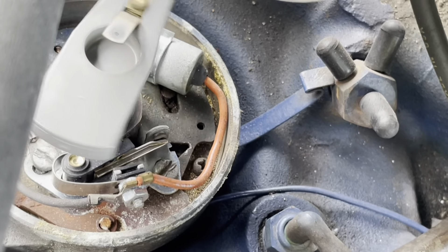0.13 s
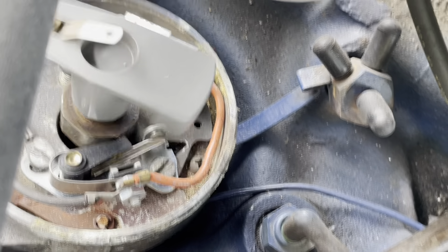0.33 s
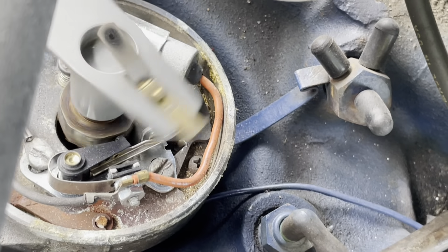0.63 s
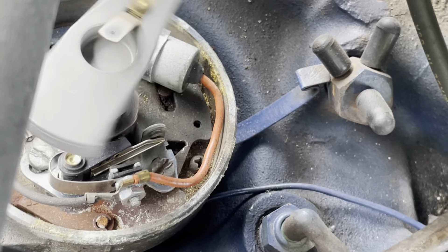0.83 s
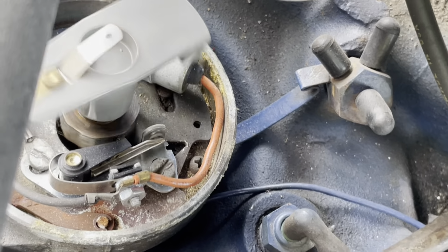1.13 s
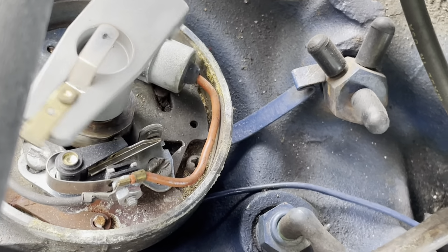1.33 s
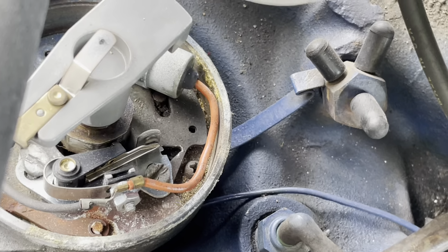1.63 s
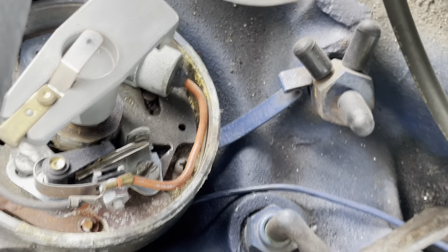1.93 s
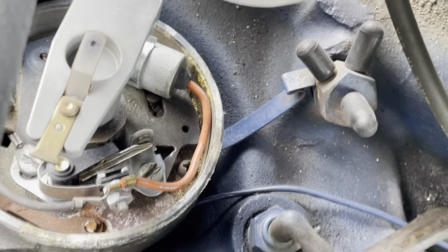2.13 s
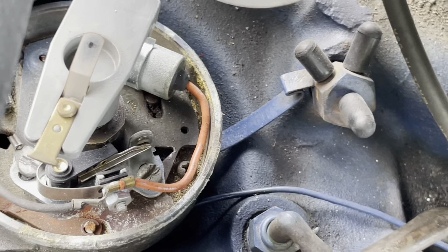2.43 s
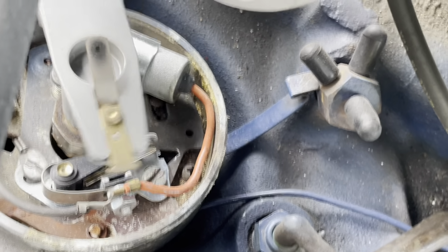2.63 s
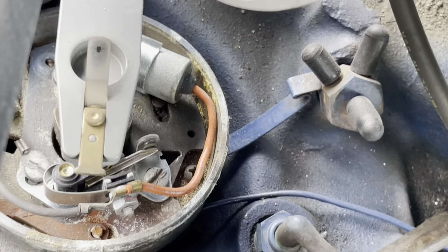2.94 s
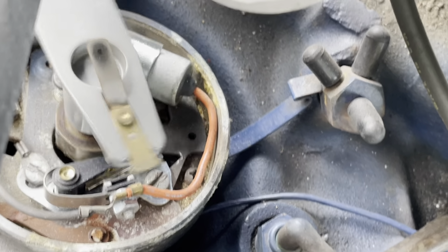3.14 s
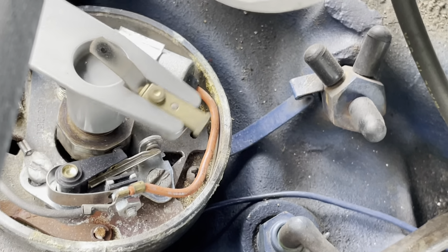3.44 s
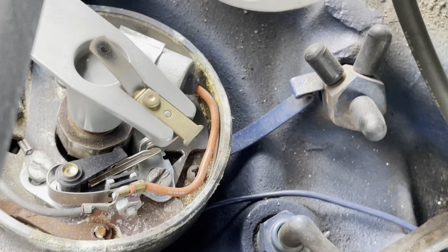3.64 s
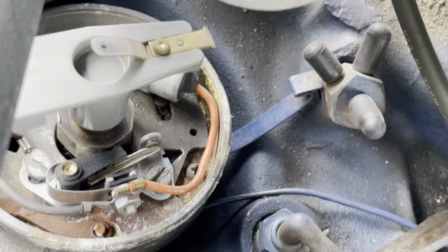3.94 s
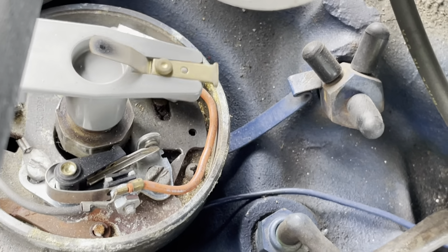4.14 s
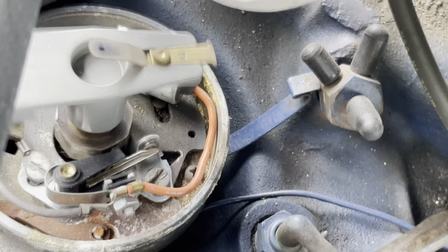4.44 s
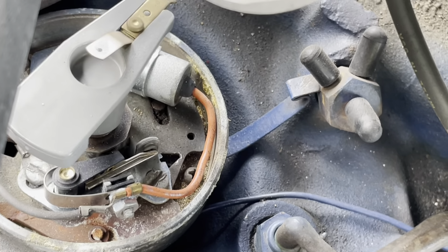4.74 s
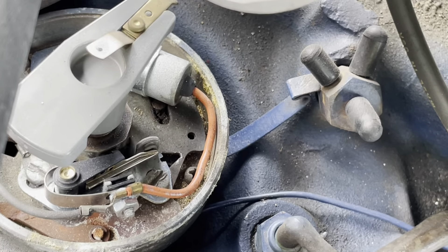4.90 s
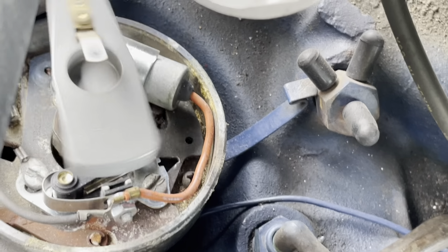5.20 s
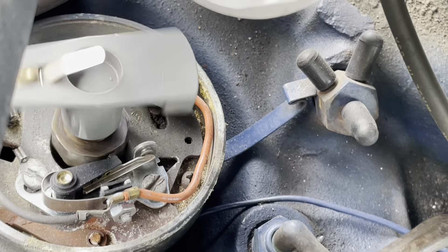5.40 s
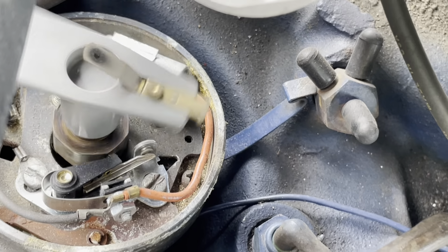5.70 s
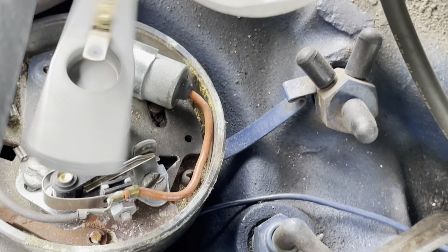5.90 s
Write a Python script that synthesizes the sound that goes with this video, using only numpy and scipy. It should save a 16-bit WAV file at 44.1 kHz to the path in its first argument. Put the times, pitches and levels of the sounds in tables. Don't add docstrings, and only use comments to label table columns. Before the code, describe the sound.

Heard very close in a garage with short hard echoes and almost no background noise. From 0 to 1.1 seconds a starter cranks a cold engine: gritty metallic grinding and a rough gear whine surge about ten or eleven times a second, sagging in pitch on each compression. At 1.15 it releases with clacks, and a thin airy whirr fades while low rumble dies. At 1.9 a loud clank and grating clash land, with a brief hum sliding down until about 2.4. Hard bumps slam at 2.5, 3.03, 3.73 and 4.37, each followed by a duller rebound, rocking rumble and lighter release knocks; a metal cover rings at mid pitch, and thin high squeaks appear near 2.85, 3.4 and 4.1. Between them it nearly falls silent. A fifth slam at 5.03 turns into renewed pulsing cranking from 5.2, gathering speed, continuing past 6 seconds without firing.

```python
import sys
import numpy as np
from scipy import signal
from scipy.fft import rfft, irfft, next_fast_len
from scipy.io import wavfile

SR = 44100
rng = np.random.default_rng(int(sys.argv[2]) if len(sys.argv) > 2 else 0)


def unload_wav(signal):
    wavfile.write(
        sys.argv[1],
        SR,
        np.round(np.clip(np.atleast_2d(signal).T, -1, 1) * 32767).astype(np.int16),
    )


def undo_db(level):
    steps = np.asarray(level, float) / 20
    return 10 ** steps


N = 267378
SIZE = next_fast_len(N + SR)
HZ = np.maximum(np.arange(SIZE // 2 + 1) * SR / SIZE, 1.0)
TIME = np.arange(N) / SR
DELAY = np.exp(-2j * np.pi * HZ / SR)


def rms_one(x):
    return x / np.sqrt(np.mean(x ** 2) + 1e-20)


def at_hz(points, hz):
    points = np.array(points, float)
    log_hz = np.log(np.maximum(points[:, 0], 1.0))
    return np.interp(np.log(hz), log_hz, points[:, 1])


def shaped(x, response):
    return irfft(rfft(x, SIZE) * response, SIZE)[..., :N]


def drift(rate_hz):
    r = np.exp(-2 * np.pi * rate_hz * 8 / SR)
    settle = 4000
    noise = rng.standard_normal(N // 8 + 2 + settle)
    slow = signal.lfilter([1], [1, -2 * r, r * r], noise)[settle:]
    return np.interp(np.arange(N) / 8, np.arange(len(slow)), rms_one(slow))


def resonance(hz, t60):
    r = undo_db(-60 / (t60 * SR))
    w = 2 * np.pi * hz / SR
    poles = 1 - DELAY * (2 * r * np.cos(w) - r * r * DELAY)
    return (1 - r * r) / 2 * (1 - DELAY * DELAY) / poles


def struck(s, rise, t60):
    i = max(round(s * SR), 0)
    t = TIME[:min(N - i, SR)]
    swell = np.clip(t / max(rise, 2e-4), 0, 1)
    return i, t, swell * undo_db(-60 * np.maximum(t - rise, 0) / max(t60, .01))


def tone(spans, wobble):
    out = np.zeros(N)
    for rows in spans:
        s, hz, level_db = np.transpose(rows)
        fade = np.clip(np.minimum(TIME - s[0], s[-1] - TIME) / 0.0027, 0, 1)
        pitch = np.interp(TIME, s, hz) * (1 + wobble * drift(40.0))
        phase = 2 * np.pi * np.cumsum(pitch) / SR
        out += np.sqrt(2) * fade * undo_db(np.interp(TIME, s, level_db)) * np.sin(phase)
    return out


# (frequency [Hz], level [dB])
IRON_COLOUR = [(25, -21), (50, -11.5), (80, -1.5), (135, -4.5), (200, -2.5), (265, -10.5), (400, -4.5),
               (650, -7.5), (1000, -9), (1450, -7.5), (2500, -11), (4200, -8.5), (6000, -11.5),
               (7300, -15.5)]
HUSH_DB = -68


def room_hush():
    noise = rng.standard_normal((2, N))
    return undo_db(HUSH_DB) * rms_one(shaped(noise, undo_db(at_hz(IRON_COLOUR, HZ))))


# (frequency [Hz], level against the direct sound [dB])
ECHO_WIDTH = [(60, -21), (160, -11.5), (300, -9), (500, -8.5), (900, -5), (1800, -4.5), (2300, -15),
              (3300, -22.5), (5500, -35), (7000, -4), (8200, -24), (9800, -1), (11500, -17), (13200, 0),
              (15000, -14)]
ECHO_T60_S = .1


def garage(x):
    t = TIME[:SR // 4]
    sprays = rng.standard_normal((2, len(t))) * undo_db(-60 * t / ECHO_T60_S)
    sprays = sprays / np.sqrt(np.sum(sprays ** 2, axis=1, keepdims=True))
    path = 2.5 * drift(4)
    walls = rfft(sprays, SIZE) * undo_db(at_hz(ECHO_WIDTH, HZ))
    echoes = shaped(x * [np.cos(path), np.sin(path)], walls)
    return echoes.sum(axis=0) * [[1], [-1]]


# (time [s], level [dB])
FREEWHEEL_LEVEL = [
    (1.17, -65),
    (1.22, -37.5),
    (1.5, -42),
    (1.89, -49.5),
    (1.9, -95),
]
# (frequency [Hz], decay T60 [s], level [dB])
FREEWHEEL_MODES = [(5200, 0.013, -11), (5630, 0.016, -4), (5890, .012, -4), (7030, 0.01, -9)]


def freewheel():
    response = sum(undo_db(level_db) * resonance(hz, t60) for hz, t60, level_db in FREEWHEEL_MODES)
    whirr = rms_one(shaped(rng.standard_normal(N), response))
    level_db = np.interp(TIME, *np.transpose(FREEWHEEL_LEVEL), left=-120)
    return whirr * undo_db(level_db + 1.5 * drift(14.0))


# (time [s], frequency [Hz], level [dB])
HUM_GLIDE = [
    [(1.98, 197.6, -15), (2.014, 175.5, -29), (2.054, 180.3, -27), (2.178, 162.5, -40), (2.314, 165.5, -38),
     (2.334, 164, -57), (2.41, 168, -42), (2.46, 182, -60)],
]


def motor_hum():
    return tone(HUM_GLIDE, wobble=0.033)


# (time [s], frequency [Hz], level [dB])
COVER_RINGING = [
    [(0.0, 539.2, -24.5), (0.024, 549, -27), (0.068, 543, -29), (0.1, 546, -27)],
    [(2.875, 545.5, -16), (2.881, 550, -22), (2.889, 550, -51), (2.903, 548, -31), (3.0, 530, -46.5)],
    [(3.492, 542, -15), (3.498, 545.4, -17), (3.512, 554, -53), (3.52, 539, -26.5), (3.66, 530, -50)],
    [(3.76, 547.8, -38), (3.78, 552, -35), (3.794, 538, -38), (3.812, 565, -25), (3.87, 590, -51)],
    [(4.125, 565.3, -17), (4.143, 550, -46), (4.151, 544.1, -37), (4.241, 524, -47), (4.25, 537.9, -38)],
    [(4.43, 553, -29), (4.46, 555, -24), (4.478, 563.6, -49), (4.516, 540.6, -19.5), (4.678, 539, -48),
     (4.72, 550, -62)],
]


def cover():
    return tone(COVER_RINGING, wobble=0.0043)


# (time [s], frequency [Hz], level [dB])
BEARING_SQUEAL = [
    [(2.78, 5678, -64), (2.794, 5658, -45), (2.814, 5641, -49), (2.856, 5715, -35), (2.908, 5700, -33.5),
     (2.93, 5631, -68)],
    [(3.4, 5647, -64.5), (3.41, 5682, -44), (3.422, 5720, -40), (3.435, 5649, -50)],
    [(4.04, 5550, -56), (4.048, 5800, -49), (4.126, 5720, -36), (4.156, 5707, -35), (4.165, 5700, -51)],
]


def bearing_squeal():
    return tone(BEARING_SQUEAL, wobble=0.00228)


# (time [s], frequency [Hz], level [dB], swell [s], decay T60 [s])
PART_RINGS = [(0, 220, -28, 0.012, 0.33), (.21, 2650, -20.5, 0.014, 0.19), (1.29, 1115, -26, 0.0033, 0.092),
              (1.31, 152, -27, .02, 0.17), (1.33, 56.7, -26, 0.022, 0.92), (1.72, 413, -35.5, 0.0071, 0.1),
              (1.915, 356, -14.5, 0.0065, 0.19), (1.95, 333, -14.5, 0.017, 0.18),
              (2.22, 716, -43, 0.012, 0.96), (2.33, 1635, -61, 0.057, 1.4), (2.52, 82, -42, .04, 0.66),
              (2.874, 433, -26.5, 0.0034, 0.21), (3.05, 81, -28, 0.034, 0.37),
              (3.1, 2450, -45, 0.026, 0.71), (3.495, 5680, -36, .008, .12), (3.73, 330, -16, .01, 0.15),
              (3.75, 80, -33.5, 0.028, .6), (3.77, 803, -29, .02, 0.19), (4.39, 80.4, -36, 0.022, 0.38),
              (4.45, 813, -28, 0.038, 0.24), (5.06, 81, -32.5, 0.047, 0.38), (5.4, 907, -27, 0.038, .8),
              (5.71, 906, -28.5, 0.016, .5), (5.941, 2980, -31, 0.016, .25), (5.97, 73, -25, 0.015, 0.23),
              (6.02, 84.5, -25, .02, 0.37)]


def rings():
    out = np.zeros(N)
    unsteady = undo_db(2.0 * drift(54.0))
    for s, hz, level_db, swell, t60 in PART_RINGS:
        i, t, shape = struck(s, swell, t60)
        out[i:i + len(t)] += np.sqrt(2) * undo_db(level_db) * shape * np.sin(2 * np.pi * hz * t)
    return out * unsteady


# (time [s], load [dB], tooth rate [Hz], loaded time [s], tooth tone level [dB])
COMPRESSIONS = [(-.01, -12, 339.2, 0.0701, -7.5), (.095, -3.5, 380.4, .07, 0.5),
                (.212, -3, 425.4, 0.074, 4.5), (0.319, 5, 485, 0.0639, -2),
                (0.404, -1.5, 498.5, 0.054, 1.5), (0.497, -13, 495.1, 0.079, -0.5),
                (0.584, -9, 497.7, 0.064, -7), (0.668, -2.5, 502.6, 0.0457, -1),
                (0.748, -14, 497.3, 0.08, -4), (0.827, -2, 500.8, 0.0678, 1.5),
                (0.923, -5, 495.6, 0.04, -8.5), (1.01, -8, 491.6, 0.0623, 1), (1.089, -1.5, 500, .05, -3),
                (5.185, -11, 385, .08, -2), (5.305, -1.5, 430.4, 0.0803, 1.5),
                (5.408, -2, 467, 0.0705, -0.5), (5.509, -0.5, 492, 0.063, 0),
                (5.603, -9, 455, 0.0662, -0.5), (5.69, -2, 486.8, .065, -1), (5.78, -8, 491.7, 0.06, 1.5),
                (5.864, -28, 482.7, 0.0594, 0), (5.958, 0.5, 459, 0.0587, 0), (6.036, 5.5, 500, 0.04, 1.5)]
SLOWING = .11


def compression():
    load, strength, knots = np.zeros(N), np.zeros(N), []
    for s, load_db, tooth_hz, length, tone_db in COMPRESSIONS:
        part = np.clip((TIME - s) / length, 0, 1.4)
        load += np.clip(part / .1, 0, 1) * np.clip((1.3 - part) / .55, 0, 1) * undo_db(load_db)
        strength += np.clip(part / 0.2, 0, 1) * np.clip((1.15 - part) / 0.69, 0, 1) * undo_db(tone_db)
        knots += [(s, tooth_hz), (s + length, tooth_hz * (1 - SLOWING))]
    return load, strength, np.interp(TIME, *np.transpose(knots))


# (frequency [Hz], level [dB])
HOUSING_RESPONSE = [(300, -28), (450, -28.5), (800, -27), (1000, -37), (1250, -25.5), (1500, -23.5),
                    (1800, -51), (2400, -33.5), (3000, -36.5), (4500, -38)]


def teeth(strength, tooth_hz):
    phase = 2 * np.pi * np.cumsum(tooth_hz * (1 + .022 * drift(45))) / SR
    out = np.zeros(N)
    for k in range(1, 10):
        rate_hz = 18 + 5 * k
        uneven = 1 + .75 * (drift(rate_hz) + 1j * drift(rate_hz))
        out += undo_db(at_hz(HOUSING_RESPONSE, k * tooth_hz)) * np.imag(uneven * np.exp(1j * k * phase))
    return strength * out


# (time [s], peak [dB], block share [dB], hiss share [dB], decay T60 [s], rise [s])
GEAR_BLOWS = [(1.1444, -15.5, 6, -1, 0.24, 0.004), (1.1862, -20, 8.5, -5.5, 0.08, 0.0029),
              (1.293, -24.5, -1.5, -17, 0.094, 0.0041), (1.3144, -37.5, 6, 1, 0.17, 0.0058),
              (1.8972, -17, -3, 6.5, 0.32, 0.0054), (1.9144, -5, -2.5, -8, 0.12, 0.005),
              (2.5014, -13, -13, 3, 0.11, 0.012), (2.5122, -3.5, -5, -11, 0.11, 0.0033),
              (2.6243, -21, -3, -7, 0.14, 0.0036), (2.7488, -33.5, 10, -13, 0.3, 0.0061),
              (2.8737, -19, 5, -8.5, 0.11, 0.0043), (3.013, -19, 3, 2, 0.13, 0.0091),
              (3.033, -7.5, -2, -1.5, 0.11, 0.0064), (3.2291, -15, 3, -6, 0.21, 0.005),
              (3.4008, -27, 1, -16, 0.3, 0.0024), (3.4925, -21, 4.5, -3, 0.14, 0.0034),
              (3.7098, -27.5, -16, 1, 0.14, 0.0039), (3.7094, -19.5, -2, 5, 0.1, 0.0066),
              (3.7278, -7, -1.5, -3, 0.16, 0.004), (3.8928, -20.5, 6.5, 0.5, 0.088, 0.0028),
              (4.016, -37, -5, -6, 0.094, 0.005), (4.1217, -20.5, 1.5, -7, 0.13, 0.0047),
              (4.354, -15, -5, 1, 0.094, 0.0082), (4.3718, -5, -2, -6, 0.085, 0.0077),
              (4.5092, -18, 1, -9, 0.079, 0.0043), (4.664, -39, 14, -27, 0.058, 0.0035),
              (4.791, -22, 2.5, -6, 0.15, 0.0026), (5.0155, -32.5, -10.5, -2, 0.13, 0.0041),
              (5.018, -17, 0.5, 3, 0.17, 0.0067), (5.0358, -6, -2, -5, 0.091, 0.0058)]
AIR_BLOW_DB = -1.5
CRACK_DB, CRACK_RISE_S, CRACK_T60_S = 2.5, 0.00096, 0.029


def blows():
    force = np.zeros((5, N))
    for s, peak_db, block_db, hiss_db, t60, rise in GEAR_BLOWS:
        i, t, body = struck(s, rise, t60)
        span = slice(i, i + len(t))
        shares_db = np.array([block_db - 15, block_db, 0, hiss_db, hiss_db + AIR_BLOW_DB])
        force[:, span] += undo_db(peak_db - 6.0 + shares_db)[:, None] * body
        crack = struck(s, CRACK_RISE_S, CRACK_T60_S)[2]
        crack_db = peak_db + hiss_db + CRACK_DB - np.array([[7.5], [0]])
        force[3:, span] += undo_db(crack_db) * crack
    return force


# (frequency [Hz], level [dB], decay T60 [s])
IRON_MODES = [(60, -4.5, 0.51), (330, -2.5, 0.12), (439.2, -6, 0.17), (544.5, 4.5, 0.28),
              (808.4, 2.5, 0.098), (1115, -6.5, 0.098), (1360, -10, 0.14), (1495, -4.5, 0.31),
              (1620, -4, 0.27), (1922, -3.5, 0.18), (2256, -2.5, 0.055), (2438, -2, 0.046), (2980, -5, .08),
              (3130, -8.5, 0.043), (3520, -6, 0.082), (4110, -1, 0.062), (4410, -5.5, .09),
              (4824, -2, 0.042), (5190, -5, 0.035), (5620, -5.5, 0.044), (5870, -1.5, 0.073),
              (6760, -0.5, 0.17), (7090, -5.5, 0.024)]
BAND_BORDERS = (235, 950, 3250, 7600)


def iron_bands():
    response = np.ones((2, len(HZ)), complex)
    for hz, level_db, t60 in IRON_MODES:
        uneven_db = rng.choice([-1, 1]) * np.array([[5], [-5]])
        response += undo_db(level_db + 3.0 + uneven_db) * resonance(hz, t60)
    response = response * undo_db(at_hz(IRON_COLOUR, HZ))
    lows = [1 / (1 + 1.414j * HZ / edge - (HZ / edge) ** 2) ** 2 for edge in BAND_BORDERS]
    highs = [low * (HZ / edge) ** 4 for low, edge in zip(lows, BAND_BORDERS)]
    slices = [high * low * response for high, low in zip([1] + highs, lows + [1])]
    return [s / np.sqrt(np.mean(np.abs(s) ** 2, axis=1, keepdims=True)) for s in slices]


def grit(per_s, spread_db):
    contacts = rng.random(N) < per_s / SR
    sizes = undo_db(spread_db * np.minimum(rng.exponential(1, N), 2)) * contacts
    return rms_one(rng.standard_normal(N) * (1 + sizes))


# (time [s], rocking rumble [dB], block [dB], gear grind [dB], brush hiss [dB])
RUNNING_NOISE = [
    [(0.0, -45, -31, -36.5, -43), (0.146, -37.5, -32.5, -28.5, -34.5), (0.286, -39.5, -33.5, -30.5, -30),
     (0.418, -39, -36.5, -26.5, -29), (0.544, -34, -26.5, -23, -29), (0.698, -38.5, -33.5, -25.5, -23.5),
     (0.908, -39, -27.5, -25.5, -34.5), (1.038, -36.5, -35, -24.5, -22), (1.13, -40, -33, -27, -31)],
    [(1.14, -38, -27, -24.5, -37), (1.222, -36, -33, -42, -51), (1.33, -31, -37.5, -42, -40.5),
     (1.418, -37.5, -44, -45, -41.5), (1.688, -45.5, -45, -51, -45.5), (1.89, -51, -48.5, -48, -47.5)],
    [(2.11, -48, -39, -48, -57), (2.164, -43, -42, -49.5, -60), (2.256, -41, -40.5, -50, -55.5),
     (2.306, -44.5, -48, -57.5, -69), (2.495, -47, -59, -62, -62.5)],
    [(2.505, -35, -38, -24, -55), (2.555, -22, -36, -49, -69), (2.591, -43, -31.5, -30.5, -43),
     (2.675, -36, -25.5, -38.5, -45), (2.719, -42.5, -36.5, -46.5, -62), (2.863, -45, -42, -37.5, -38),
     (2.933, -42, -41, -65, -51), (3.005, -54, -52, -50, -54)],
    [(3.015, -46, -46, -30, -30), (3.063, -38, -27, -35, -40), (3.193, -41, -30, -30.5, -37),
     (3.303, -40, -33.5, -46, -57), (3.391, -39, -33.5, -44, -51), (3.475, -50.5, -48, -37.5, -40.5),
     (3.533, -45, -48, -55, -60), (3.7, -51, -52, -56.5, -60)],
    [(3.71, -54, -32, -35, -24), (3.762, -30, -36, -66.5, -47), (3.796, -41, -41, -33.5, -42.5),
     (3.884, -40, -27.5, -29.5, -37), (3.932, -34, -26, -32.5, -37), (3.992, -40, -36, -47.5, -60),
     (4.048, -43, -33.5, -35.5, -39.5), (4.13, -54, -39, -38, -36), (4.186, -43, -44, -53.5, -53),
     (4.345, -56, -57.5, -59, -56)],
    [(4.355, -51, -34, -39, -28), (4.411, -39, -36, -33, -38), (4.521, -42, -26, -34, -43),
     (4.579, -38, -30.5, -37.5, -44), (4.649, -46, -35.5, -45.5, -63), (4.709, -40, -46.5, -54, -46),
     (4.791, -55.5, -48, -53, -55), (4.849, -45.5, -46, -78, -80.5), (5.005, -54.5, -61, -62, -62)],
    [(5.02, -56, -43, -31, -36), (5.068, -51, -60, -57, -72), (5.098, -31.5, -29.5, -37.5, -48),
     (5.188, -47, -31, -31.5, -42), (5.242, -42, -32.5, -34, -35), (5.376, -40, -38, -26, -28),
     (5.496, -44, -32, -28.5, -34.5), (5.734, -37, -35, -27.5, -25.5), (5.888, -41.5, -26, -25.5, -31),
     (6.06, -25.5, -44.5, -31, -28.5)],
]
# (time [s], rumble [dB], block [dB], grind [dB], hiss [dB])
PINION_CLASH = [
    (1.94, -34.5, -26, -23, -30),
    (1.966, -59, -13, -20, -17.5),
    (2.004, -32.5, -19.5, -19.5, -18.5),
    (2.036, -38, -14, -18.5, -22),
    (2.076, -39, -32.5, -33, -42.5),
    (2.1, -40, -29.5, -47, -50),
]
LOAD_SWELL = (0.93, 4.4, 3.83, 3.05, 4.3)
AIR_RUNNING_DB = -7.5


def grind(load):
    rows = sorted(tuple(row) for span in RUNNING_NOISE + [PINION_CLASH] for row in span)
    s, *levels_db = np.transpose(rows)
    levels_db.append(levels_db[2] + AIR_RUNNING_DB)
    spectrum, force, shared = 0, blows(), drift(25.0)
    for band, level_db, swell_db, hit in zip(iron_bands(), levels_db, LOAD_SWELL, force):
        flicker_db = .6 * shared + 1.2 * drift(30)
        running = undo_db(np.interp(TIME, s, level_db) + swell_db * load + flicker_db)
        place = np.pi / 4 * (1 + np.tanh(1.5 * drift(5)))
        drive = grit(per_s=900, spread_db=3) * np.hypot(running, hit)
        contacts = drive * [np.cos(place), np.sin(place)]
        spectrum = spectrum + np.sum(rfft(contacts, SIZE) * band, axis=0)
    return irfft(spectrum, SIZE)[:N]


def scene():
    load, strength, tooth_hz = compression()
    engine = freewheel() + motor_hum() + cover() + bearing_squeal()
    engine += rings() + teeth(strength, tooth_hz) + grind(load)
    return engine + garage(engine) + room_hush()


def top_cut(x):
    return signal.sosfilt(signal.butter(12, 16520, fs=SR, output="sos"), x)


# (frequency [Hz], level [dB])
MIC_TREBLE = [(7300, -2), (8500, -1.5), (10000, -10), (12000, -10.5), (14000, -24.5), (15000, -13),
              (15650, -6.5), (15900, -36.5), (16500, -39.5), (17000, -59)]
# (frequency [Hz], phase [half turns])
PORT_LEAD = [(0, 0), (6100, 0), (7000, -.3), (7900, -.95), (8850, -1.04), (11000, -1.95), (12200, -2.05),
             (13500, -2.55), (14000, -3), (22050, -3)]


def record(dry):
    lead = np.interp(HZ, *np.transpose(PORT_LEAD)) * np.pi / 2
    turn = np.exp(1j * lead * np.array([[1], [-1]]))
    ports = shaped(dry, undo_db(at_hz(MIC_TREBLE, HZ)) * turn)
    mix = 1.219 * np.tanh(ports / 1.39)
    return top_cut(mix)


dry = scene()
out = record(dry)
unload_wav(out)
```